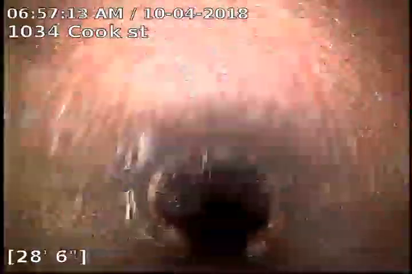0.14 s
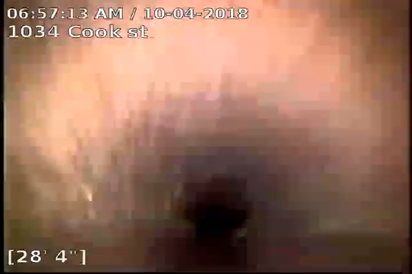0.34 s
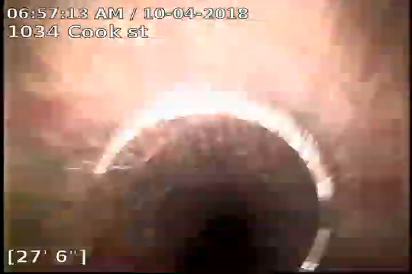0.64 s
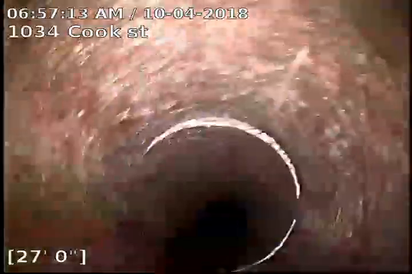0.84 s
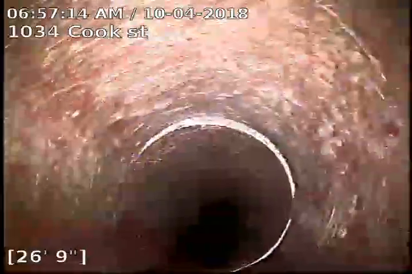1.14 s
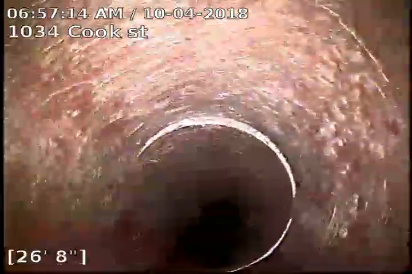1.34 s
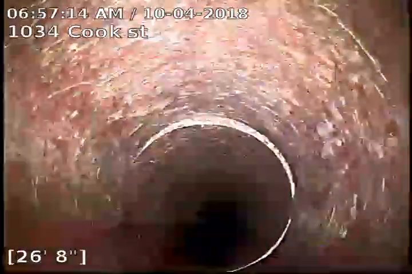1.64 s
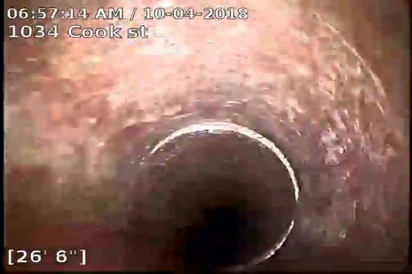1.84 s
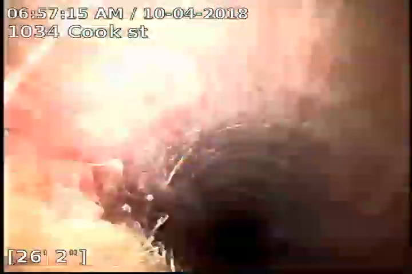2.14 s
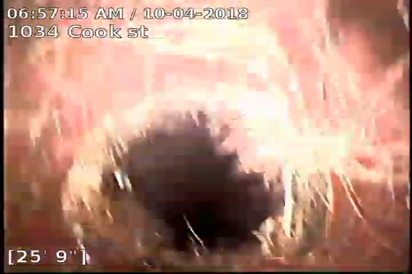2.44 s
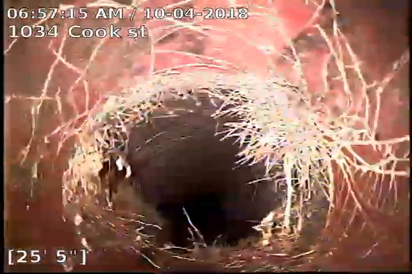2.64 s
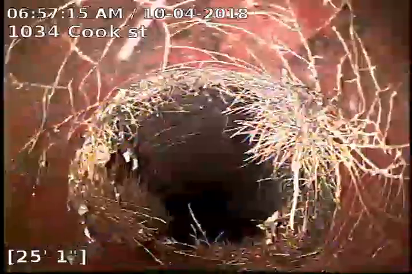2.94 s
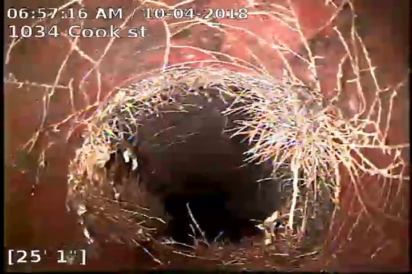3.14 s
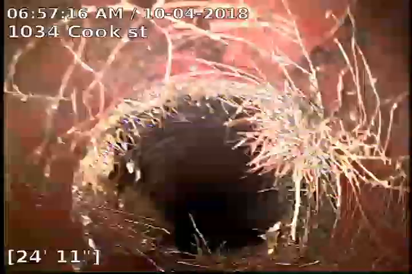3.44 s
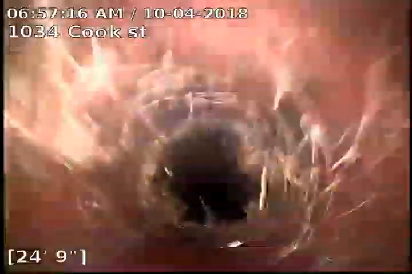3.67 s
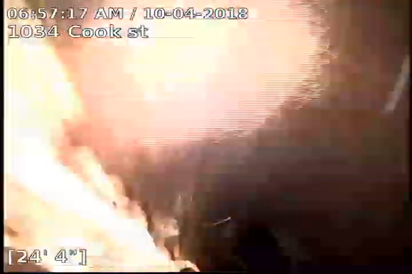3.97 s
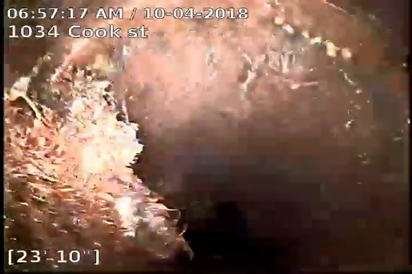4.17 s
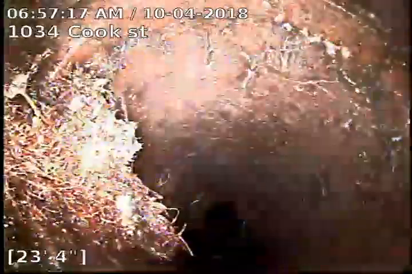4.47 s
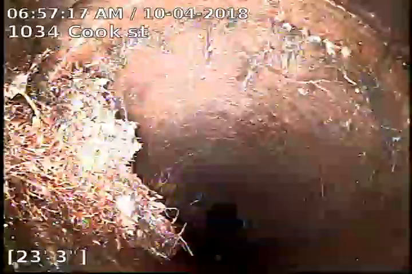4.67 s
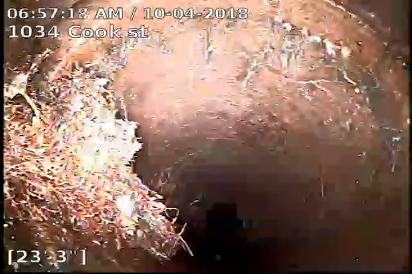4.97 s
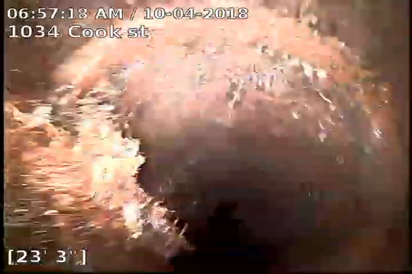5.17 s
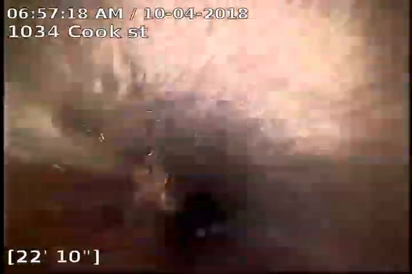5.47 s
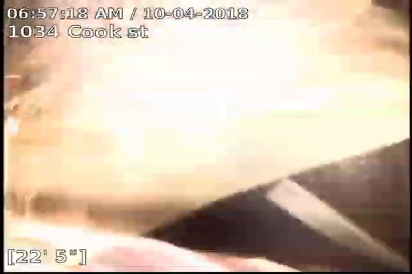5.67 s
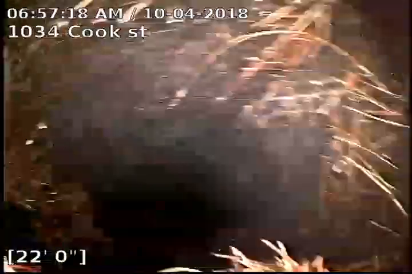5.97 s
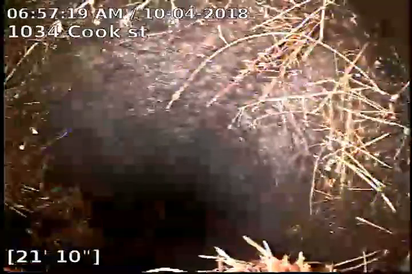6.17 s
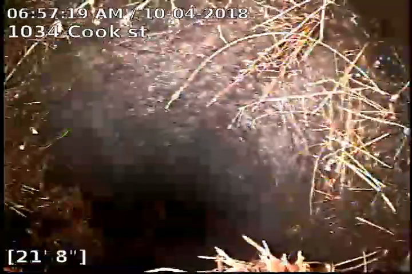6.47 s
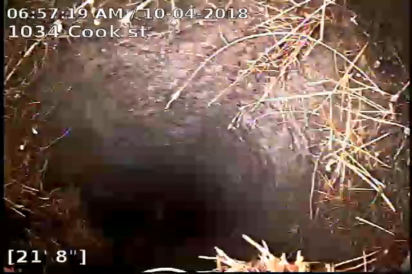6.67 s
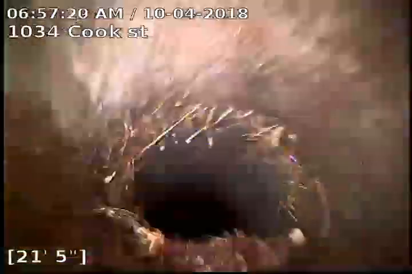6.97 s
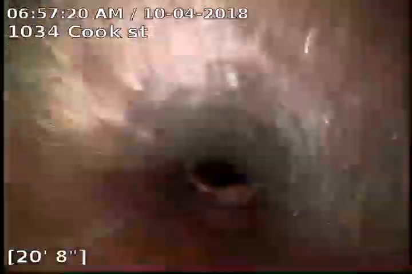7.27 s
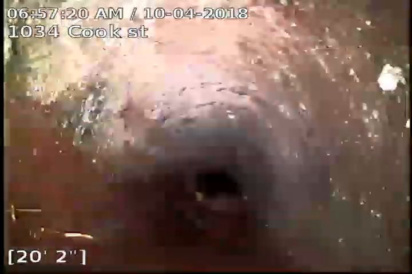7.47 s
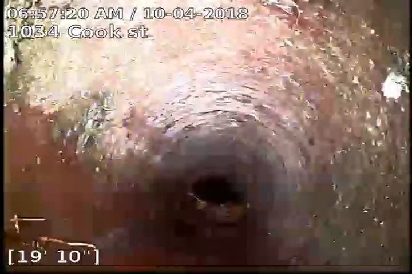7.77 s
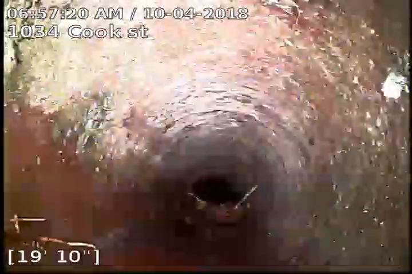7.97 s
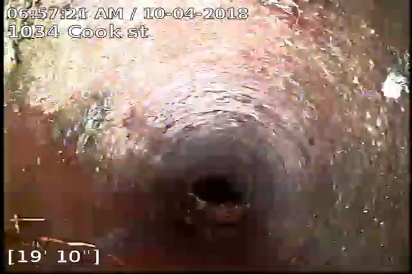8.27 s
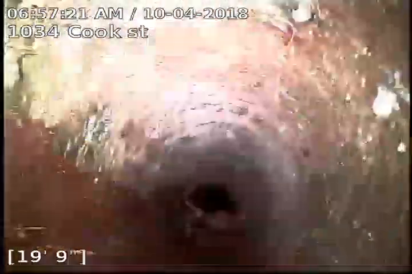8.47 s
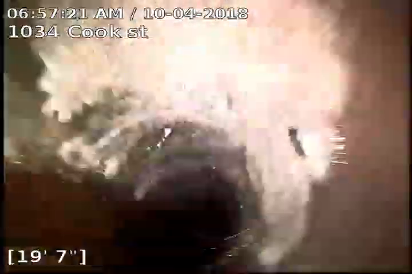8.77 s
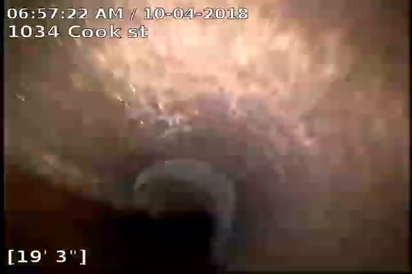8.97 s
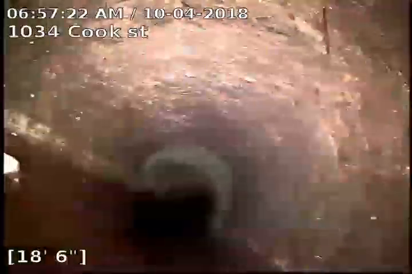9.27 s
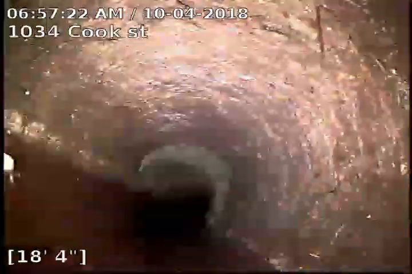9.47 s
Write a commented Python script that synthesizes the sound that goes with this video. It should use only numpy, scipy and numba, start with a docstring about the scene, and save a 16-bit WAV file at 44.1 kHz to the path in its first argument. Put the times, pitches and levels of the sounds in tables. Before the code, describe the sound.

Someone reels a push cable hand over hand onto its drum outdoors. Quiet grainy scraping with slight metallic ringing comes and goes about every second and a half, with smooth hissing glove slides between. Abrupt hard slaps crack and boom briefly, the strongest distorting the close microphone. Small knocks, dry grit snaps and rare tiny squeaks are scattered around, with a weak distant engine hum in the middle.

```python
"""Cable hauled onto a drum

A stiff push cable is hauled hand over hand out of a drain and fed back onto its drum, beside a fixed microphone.
Each haul is gritty noise through patchy bands and cable resonances; a glove then slides down as a swelling hiss.
Coils slap the drum as noise bursts ringing its modes, the hardest overloading the input. Grit ticks, cable squeaks.
Behind are a far engine's tone, an outdoor murmur and input noise."""
import sys
import numpy as np
from scipy import signal
from scipy.fft import rfft, irfft, next_fast_len
from scipy.io import wavfile
from scipy.ndimage import uniform_filter1d
from numba import njit

SR = 44100
rng = np.random.default_rng(int(sys.argv[2]) if len(sys.argv) > 2 else 0)


def unload_audio(sound):
    """Save the sound as a 16-bit wav file, at the path given as the first command line argument."""
    columns = np.transpose(np.atleast_2d(sound))
    # keep every value between -1 and 1, then stretch to whole-number steps
    steps = np.round(np.clip(columns, -1, 1) * 32767)
    wavfile.write(sys.argv[1], SR, steps.astype(np.int16))


N = 424241


def undb(db):
    """Gain of a level in dB."""
    return 10 ** (np.asarray(db) / 20)


def unit(x):
    """Scaled to rms 1."""
    return x / np.sqrt(np.mean(x ** 2))


def curve(rows):
    """Columns of a table that starts with seconds, interpolated sample by sample."""
    s, *columns = np.transpose(rows)
    return [np.interp(np.arange(N) / SR, s, column) for column in columns]


def spectrum_db(hz, spectrum):
    """Levels of a (Hz, dB) table, interpolated over log frequency."""
    table_hz, table_db = np.transpose(spectrum)
    return np.interp(np.log(hz), np.log(table_hz), table_db)


def colour(x, spectrum):
    """Filter to a spectrum of (Hz, dB) points, rms 1."""
    size = next_fast_len(len(x))
    hz = np.arange(size // 2 + 1) * SR / size + 1  # +1 keeps the log finite
    filtered = irfft(rfft(x, size) * undb(spectrum_db(hz, spectrum)), size)
    return unit(filtered[:len(x)])


def high_pass(hz):
    """Second-order Butterworth high-pass."""
    return signal.butter(2, hz, "high", fs=SR, output="sos")


@njit
def band_pass(x, hz, width_hz):
    """State-variable band-pass with a moving centre, gain 1 there."""
    y, band, low = np.empty(len(x)), 0., 0.
    for i in range(len(x)):
        g, damping = np.tan(np.pi * hz[i] / SR), width_hz / hz[i]
        v = (band + g * (x[i] - low)) / (1 + g * (g + damping))
        band, low = 2 * v - band, low + 2 * g * v
        y[i] = damping * v
    return y


def walk(rate_hz):
    """Random levels held 1 / rate_hz and slewed twice; spread near 1."""
    hold = int(SR / rate_hz)
    steps = np.repeat(rng.standard_normal(N // hold + 1), hold)
    return 1.89 * uniform_filter1d(uniform_filter1d(steps, hold), hold)[:N]


def grit(size_db=1.5):
    """Dense noise grains of uneven level, 64 samples (1.5 ms) each."""
    sizes = np.minimum(rng.exponential(size=N // 64 + 1), 5.)
    return rng.standard_normal(N) * undb(size_db * np.repeat(sizes, 64)[:N])


# Outdoor murmur spectrum. Each row: frequency in Hz, relative level in dB per Hz.
YARD_SPECTRUM = [(12, -34.5), (20, -12), (35, -26), (41, -47), (55, -5), (271, -5.5), (488, -11.5),
                 (743, -11.5), (1580, -21.5), (2850, -22.5), (10600, -26), (14900, -42), (16200, -61)]
YARD_DB = -51.5


def yard():
    """Distant outdoor murmur of traffic and air: coloured noise, swelling slowly."""
    return undb(YARD_DB + 0.66 * walk(0.76)) * colour(rng.standard_normal(N), YARD_SPECTRUM)


# Far engine's firing tone. Each row: time in seconds, pitch in Hz, mean level in dB rms.
ENGINE_TONE = [(2.4, 54, -63), (2.74, 54.2, -58), (3.47, 63, -58), (3.75, 70.8, -51), (4.12, 71, -63),
               (4.24, 72.6, -52), (5.52, 72, -56), (5.71, 64.7, -61), (6.25, 65, -76)]


def engine():
    """Only the firing tone carries this far: one gliding sine whose level wavers a little."""
    first_s, first_hz, _ = ENGINE_TONE[0]
    last_s, last_hz, _ = ENGINE_TONE[-1]
    hz, db = curve([(first_s - .1, first_hz, -90), *ENGINE_TONE, (last_s + .1, last_hz, -90)])
    return np.sqrt(2) * undb(db + 1.5 * walk(5.7)) * np.sin(2 * np.pi * np.cumsum(hz) / SR)


# Squeaks where the cable binds. Each row: loudest moment in seconds, pitch there in Hz, level there in dB,
# swell in dB per second, glide in Hz per second.
BINDING_SQUEAKS = [(1.43, 2680, -40, 250, 800), (3.108, 2680, -38.5, 200, 4500),
                   (8.15, 2600, -45.5, 93, 800)]
SQUEAK_FALL_DB_PER_S, SQUEAK_WIDTH_HZ = 500, 590.0


def squeaks():
    """Rough stick-slip noise in one narrow gliding resonance, filtered twice."""
    out, t = 0, np.arange(N) / SR
    for s, peak_hz, db, swell_db_per_s, glide_hz_per_s in BINDING_SQUEAKS:
        hz = peak_hz + glide_hz_per_s * np.clip(t - s, -.1, .1)
        fade_db = np.where(t < s, swell_db_per_s * (t - s), SQUEAK_FALL_DB_PER_S * (s - t))
        once = band_pass(grit(size_db=-2.0), hz, SQUEAK_WIDTH_HZ)
        out = out + undb(db + fade_db) * unit(band_pass(once, hz, SQUEAK_WIDTH_HZ))
    return out


# Grit snapping under the cable. Each row: time in seconds, peak level in dB.
GRIT_TICKS = [(0.389, -29), (0.5142, -31), (1.4012, -36), (3.049, -32), (3.593, -35), (3.7406, -34),
              (4.7541, -34), (5.5293, -36), (6.465, -30), (6.973, -34), (8.4472, -37), (8.7326, -39),
              (8.9126, -30)]
TICK_DECAY_S = 0.0034


def ticks():
    """Thin dry snaps: differenced noise dying away within 10 ms."""
    out = np.zeros(N)
    t = np.arange(SR // 100) / SR
    noise = np.diff(rng.standard_normal((len(GRIT_TICKS), len(t) + 1)))  # tilted to the treble
    for (s, db), snap in zip(GRIT_TICKS, noise * np.exp(-t / TICK_DECAY_S)):
        i = int(s * SR)
        out[i:i + len(t)] += undb(db) * snap / np.max(np.abs(snap))
    return out


DETUNE = 0.035


def ring(modes, lift_db, chance, flip=1):
    """Answer of a set of modes to one tap, each mode's pitch shifted slightly by its chance value."""
    t = np.arange(SR // 4) / SR
    out = 0
    for k, (hz, db, t60_s) in enumerate(modes):
        swing = np.sin(2 * np.pi * hz * (1 + DETUNE * chance[k]) * t)
        out = out + flip ** k * undb(db + lift_db[k]) * swing * 1000. ** (-t / t60_s)
    return out


SPOT_DB, SPOT_OCTAVES = 6, 0.35
SPOT_SOFT = 0.24  # extra lift in dB for each dB that a blow is weaker


def spot(hz, spot_hz, blow_db):
    """Lift in dB of what lies near the pitch of the struck spot; a light blow wakes little else."""
    return (SPOT_DB - SPOT_SOFT * blow_db) * np.exp(-(np.log2(hz / spot_hz) / SPOT_OCTAVES) ** 2)


# Coil slaps. Each row: time in seconds, crack peak in dB, crack pitch in Hz, shell peak in dB, shell pitch in Hz,
# boom peak in dB, rattle decay time in seconds. Peaks are before the low cut.
COIL_SLAPS = [(0.2505, -5.5, 4140, -11, 794, -17, 0.0028), (0.2683, -3, 2680, -9.5, 452, -9, 0.0065),
              (0.406, -28, 2970, -30, 670, -56, 0.0041), (0.539, -26.5, 3100, -27, 570, -23, 0.0058),
              (0.5757, -28, 2000, -26, 915, -35, 0.0044), (0.649, -27, 3100, -45, 678, -56, 0.0024),
              (0.751, -26, 1530, -25.5, 664, -44, 0.0053), (0.821, -36, 3630, -40, 447, -28.5, 0.0027),
              (1.219, -38, 3090, -33.5, 570, -26, 0.0019), (1.316, -36.5, 2520, -34, 851, -34, 0.0031),
              (1.874, -32, 3750, -44, 853, -58, 0.0036), (2.131, 2.5, 1490, 0, 1320, -2.5, 0.0029),
              (2.907, -32, 2770, -30, 444, -25, 0.0052), (2.9233, -23, 2950, -24.5, 795, -20, 0.0047),
              (3.337, -29, 2960, -29, 455, -34, 0.0038), (3.385, -29.5, 2440, -65, 624, -56, 0.006),
              (3.766, -31, 2970, -21, 875, -54, 0.003), (4.156, -34, 3110, -28, 670, -28, 0.0022),
              (4.588, -45, 2040, -36, 670, -25.5, 0.0024), (4.6525, -3.5, 2760, -9, 769, -3, 0.0018),
              (4.6653, 6.5, 2570, -1.5, 1270, 5, 0.0031), (4.6714, 6, 3820, 2.5, 1290, 0.5, 0.0067),
              (4.861, -41, 3100, -35, 710, -28.5, 0.0048), (5.027, -31.5, 2280, -34, 942, -26, 0.0066),
              (5.218, -46, 3500, -48, 1250, -22, 0.003), (5.604, -18, 2170, -28, 1570, -57, 0.0026),
              (5.646, -29, 2880, -32.5, 417, -52, 0.0022), (5.806, -28, 2100, -28, 640, -37, 0.015),
              (6.0007, -2, 2140, -5.5, 860, -12, 0.0037), (6.082, -8, 2890, -6.5, 1310, -10.5, 0.0016),
              (6.0896, -2, 3279, -11.5, 1230, -3.5, 0.0039), (6.341, -17, 2750, -19, 785, -24.5, 0.0035),
              (7.152, -30, 1630, -30, 1240, -49, 0.0029), (7.198, -47, 1660, -26, 1100, -32, 0.0014),
              (7.296, -25.5, 3050, -32, 668, -56, 0.0039), (7.563, -30.5, 2990, -28.5, 437, -24, 0.001),
              (7.9475, -39, 1660, -38, 624, -32, 0.0013), (8.361, -39, 1910, -31, 580, -28, 0.0023),
              (8.5915, -45, 3200, -32.5, 423, -30, 0.0023), (9.3425, -36, 3060, -33, 1210, -41, 0.0034)]
# Drum body modes. Each row: frequency in Hz, relative level in dB, t60 in seconds.
BODY_MODES = [(237, -8, 0.17), (273, 0, 0.14), (304.7, 2.5, 0.091), (376, -3, 0.092)]
# Drum shell modes. Each row: frequency in Hz, relative level in dB, t60 in seconds.
SHELL_MODES = [(454, -4.5, 0.1), (518, -17.5, 0.045), (652, -4.5, 0.048), (788, -6, 0.05),
               (897, 0.5, 0.023), (994, -0.5, 0.015), (1146, -9.5, 0.046), (1266, 2.5, 0.038),
               (1434, -18, 0.083), (1510, 0.5, 0.015)]
# Rim, its short modes too many to tell apart. Each row: frequency in Hz, relative level in dB per Hz.
RIM_SPECTRUM = [(900, -7), (1700, 0), (2500, 1.5), (4000, 1), (5200, -2.5), (6500, -12.5), (9000, -17),
                (16000, -21.5)]
BOOM_PUSH_S, BOOM_LAG_S = 0.0052, 0.00297
TAIL_T60_S, TAIL_DB = 0.23, -23
RISE_S, SOFT_RISE_S_PER_DB = 0.0016, .00007  # a weaker blow starts slower
LOW_CUT_HZ = 360


def slaps():
    """A short rattle of contacts rings shell and rim; the drum body booms under a softer push, a little later."""
    out = np.zeros(N + SR)
    t = np.arange(SR // 4) / SR
    hz = np.arange(len(t) // 2 + 1) * SR / len(t) + 1
    rim_db = spectrum_db(hz, RIM_SPECTRUM)
    shell_modes_hz = np.transpose(SHELL_MODES)[0]
    push = np.concatenate([np.zeros(int(BOOM_LAG_S * SR)), np.hanning(int(BOOM_PUSH_S * SR))])
    after = undb(TAIL_DB) * 1000. ** (-t / TAIL_T60_S)  # loose coils and nearby walls rustle on
    for s, crack_db, crack_hz, shell_db, shell_hz, boom_db, rattle_s in COIL_SLAPS:
        noise, chance = rng.standard_normal(len(t)), rng.standard_normal(32)
        rise = np.minimum(t / (RISE_S - SOFT_RISE_S_PER_DB * min(shell_db, 0)), 1)
        shape = (np.exp(-t / rattle_s) + after) * rise
        crack = shape * irfft(rfft(noise) * undb(rim_db + spot(hz, crack_hz, crack_db)), len(t))
        shell_lift_db = spot(shell_modes_hz, shell_hz, shell_db)
        shell = signal.fftconvolve(shape * noise, ring(SHELL_MODES, shell_lift_db, chance))
        # opposed neighbours: the boom swells first
        body = ring(BODY_MODES, np.zeros(len(BODY_MODES)), chance / 4, flip=-1.23)
        boom = signal.fftconvolve(push, body)
        i = int(s * SR)
        for y, db in ((crack, crack_db), (shell, shell_db), (boom, boom_db)):
            out[i:i + len(y)] += undb(db) * y / np.max(np.abs(y))
    return signal.sosfilt(high_pass(LOW_CUT_HZ), out[:N])  # low cut, as of a microphone: little deep bass


# Glove strokes down the cable, each ending in a grip.
# Each row: grip time in seconds, stroke length in seconds, level in dB.
GLOVE_STROKES = [(1.068, 0.21, -42.5), (1.439, 0.089, -49), (2.73, 0.26, -43), (3.102, 0.063, -49),
                 (4.424, 0.25, -43), (4.79, .16, -55), (6.13, 0.29, -45), (6.522, .1, -49),
                 (7.766, 0.35, -43), (8.13, 0.055, -52), (9.46, 0.26, -43)]
# Glove hiss spectrum. Each row: frequency in Hz, relative level in dB per Hz.
GLOVE_SPECTRUM = [(1200, -37), (2600, -2), (4300, 1), (6500, -4.5), (11000, -7.5), (13500, -5), (14800, -2),
                  (15600, 2), (16200, -3.5)]
DRAG_DB, GLOVE_REST_DB = -16.5, -62.5  # drag is against the scrape
SLIDE_RISE, SLIDE_START_DB, SLIDE_END_DB = 0.66, -10, -3.5  # swelling share of a stroke; ends against its level
GRIP_S = 0.043
BRIGHT_DB, BRIGHT_HZ = -3, 12500


def glove():
    """A smooth thin hiss that grows with the stroke and stops at the grip; pulls drag the cable through too."""
    strokes = [curve([(grip_s - length_s - GRIP_S, 0),
                      (grip_s - length_s, undb(db + SLIDE_START_DB)),
                      (grip_s - (1 - SLIDE_RISE) * length_s, undb(db)),
                      (grip_s, undb(db + SLIDE_END_DB)),
                      (grip_s + GRIP_S, 0)])[0] for grip_s, length_s, db in GLOVE_STROKES]
    stroke = np.max(strokes, axis=0)
    drag = undb(scrape_level()[0] + DRAG_DB) + undb(GLOVE_REST_DB)
    hiss = colour(rng.standard_normal(N) * undb(walk(30)), GLOVE_SPECTRUM)
    top = signal.sosfiltfilt(high_pass(BRIGHT_HZ), hiss)
    # strokes are brighter than the drag
    return np.maximum(stroke, drag) * hiss + undb(BRIGHT_DB) * stroke * top


# Pulls on the cable, long hauls and the short shoves between them. Each row: four shape times in seconds, not always
# in order (start, fastest, slowing, end), scrape level in dB, drum rumble in dB against the scrape.
CABLE_PULLS = [(-0.06, 0.448, 0.79, 1.17, -42, -7.5), (1.146, 1.232, 1.26, 1.67, -48.5, 0),
               (1.65, 2.23, 2.38, 2.75, -41, -8), (2.82, 2.94, 2.8, 3.37, -47.5, -2),
               (3.388, 3.76, 4.22, 4.48, -40.5, -5.5), (4.626, 4.758, 4.85, 4.97, -43.5, 1),
               (4.92, 5.26, 6.24, 6.1, -41, -7), (6.104, 6.2, 6.58, 6.9, -51, -0.5),
               (6.693, 7.167, 7.43, 7.7, -41, -8), (7.824, 7.968, 8.7, 8.04, -50, -1),
               (8.324, 8.75, 8.98, 9.5, -40.5, -9.5)]
JERK_S, JERK_DB = 0.092, -5  # level against the full pull
REST_DB, RUMBLE_REST_DB = -56, -57


def scrape_level():
    """Scrape and rumble levels in dB drawn through each pull's points, the loudest pull winning."""
    shapes = []
    for start_s, fast_s, slow_s, end_s, db, rumble_db in CABLE_PULLS:
        jerk_s = min(start_s + JERK_S, (start_s + fast_s) / 2)
        shapes.append(curve([(start_s, REST_DB, RUMBLE_REST_DB),
                             (jerk_s, db + JERK_DB, db + rumble_db),
                             (fast_s, db, db + rumble_db),
                             (slow_s, db, db + rumble_db),
                             (end_s, REST_DB, RUMBLE_REST_DB)]))
    return np.max(shapes, axis=0)


# Scrape spectrum. Each row: frequency in Hz, relative level in dB per Hz.
SCRAPE_SPECTRUM = [(240, -37), (400, -17), (529, -6.5), (854, -6), (1400, -7), (1720, -6.5), (2820, -4),
                   (3040, -6), (3720, -6), (5070, -7), (5570, -12), (11000, -25.5), (13700, -39),
                   (15200, -32), (16200, -39)]
# Rings of the rubbing cable. Each row: frequency in Hz, width in Hz, level in dB against the scrape,
# patchiness in dB.
CABLE_RINGS = [(660, 28, -17, 2), (854, 115, -16.5, -0.5), (1233, 93, -19, 3.5), (1707, 140, -17.5, 3),
               (3036, 144, -9, 2.5), (6250, 210, -21.5, 4), (8520, 290, -28.5, 6)]


def haul():
    """Grit scrapes under the cable and sets it ringing; bumps shake the drum."""
    scrape_db, rumble_db = scrape_level()
    rings = 0
    for hz, width_hz, db, patchy_db in CABLE_RINGS:
        tone = unit(band_pass(grit(), hz * (1 + .007 * walk(9)), float(width_hz)))
        rings = rings + undb(db + patchy_db * walk(21)) * tone
    # the point of contact wanders, so each part of the range swells in its own patches
    rub = colour(grit(size_db=2.02), SCRAPE_SPECTRUM)
    patches = 0
    for hz in 480 * 2. ** np.arange(0, 5, .35):
        patches = patches + undb(2.8 * walk(32)) * band_pass(rub, np.full(N, hz), hz / 4)
    bumps = rng.standard_normal(N) * undb(2.95 * walk(25))
    still = np.zeros(len(BODY_MODES))  # no lift, no detuning
    rumble = unit(signal.fftconvolve(bumps, ring(BODY_MODES, still, still))[:N])
    return undb(scrape_db) * (unit(patches) + rings) + undb(rumble_db) * rumble


def scene():
    """One microphone feeds both channels."""
    mono = yard() + engine() + squeaks() + ticks() + slaps() + glove() + haul()
    return np.tile(mono, (2, 1))


# Input noise spectrum. Each row: frequency in Hz, relative level in dB per Hz.
INPUT_SPECTRUM = [(12, -49.5), (20, 0), (155, -22), (1720, -38.5), (5140, -37.5), (16200, -43)]
# Constant input offset, full scale 1. Columns: first channel, second channel.
INPUT_OFFSET = (.0234, .0116)
INPUT_DB, TOP_HZ = -65, 15950


def record(dry):
    """Each input channel adds its own noise and a small offset, clips at full scale and loses the top treble."""
    noise = np.array([colour(rng.standard_normal(N), INPUT_SPECTRUM) for _ in range(2)])
    wet = np.clip(dry + undb(INPUT_DB) * noise + np.array(INPUT_OFFSET)[:, None], -1, 1)
    low_pass = signal.ellip(8, .1, 50, TOP_HZ, fs=SR, output="sos")
    return np.clip(signal.sosfiltfilt(low_pass, wet), -1, 1)


dry = scene()
out = record(dry)
unload_audio(out)
```